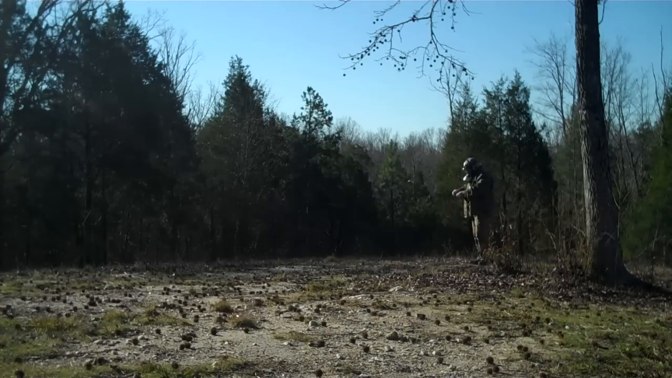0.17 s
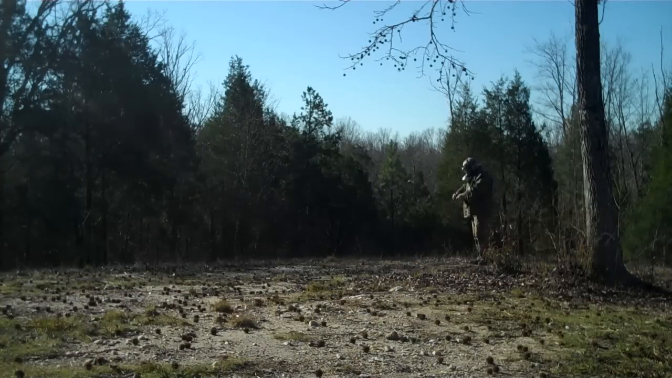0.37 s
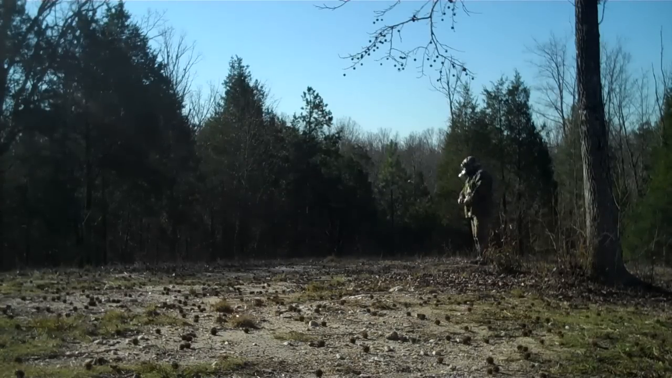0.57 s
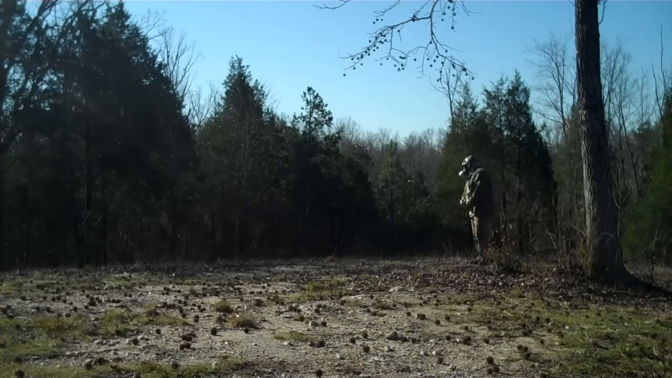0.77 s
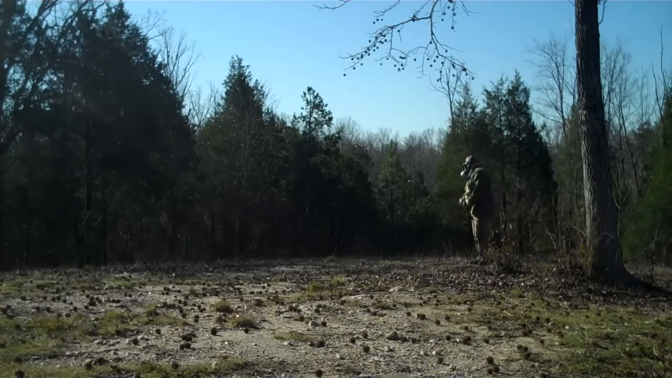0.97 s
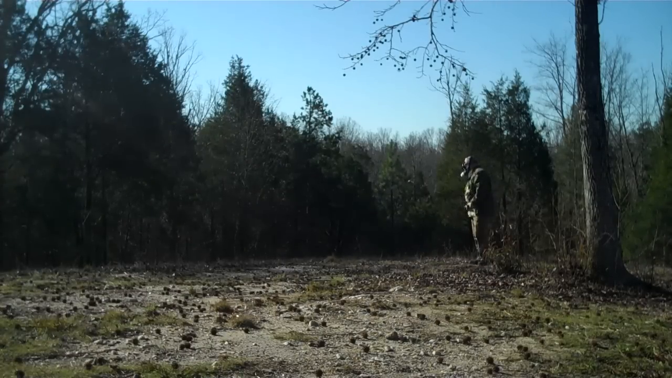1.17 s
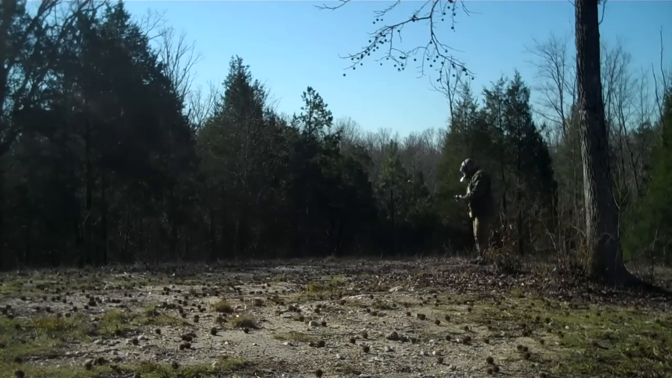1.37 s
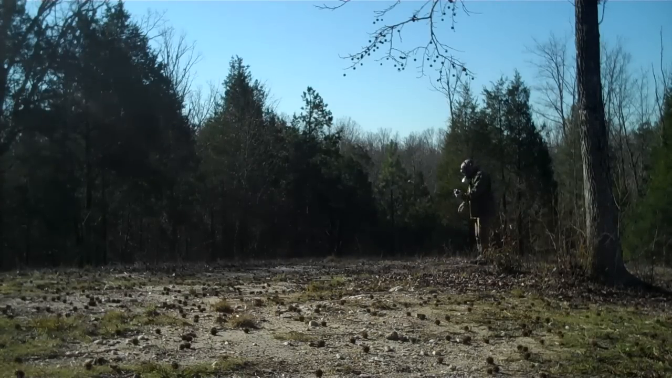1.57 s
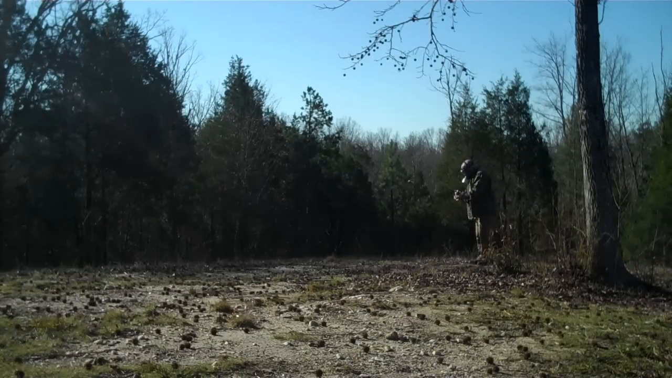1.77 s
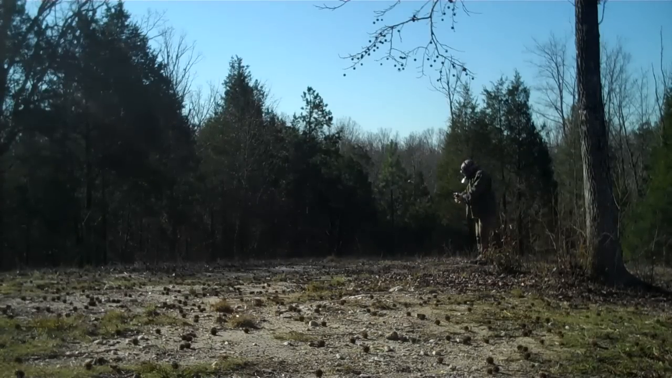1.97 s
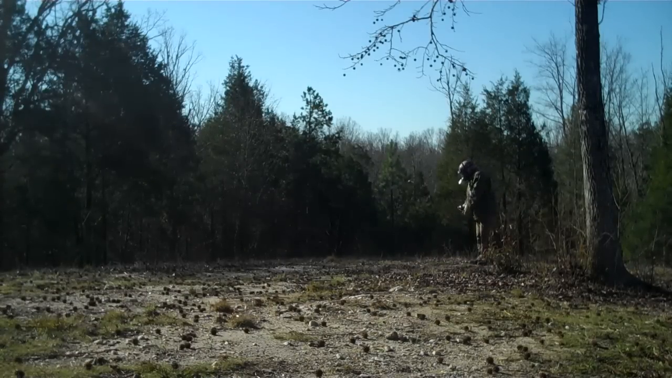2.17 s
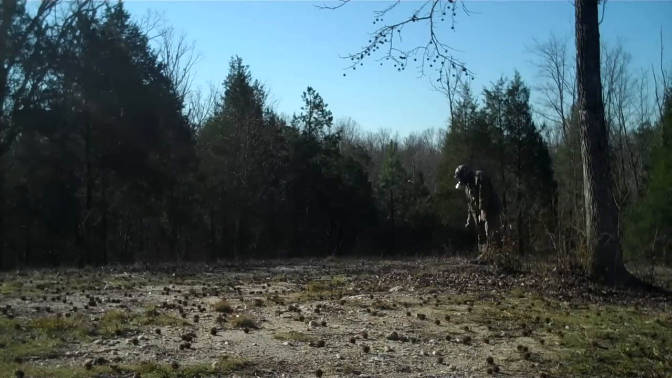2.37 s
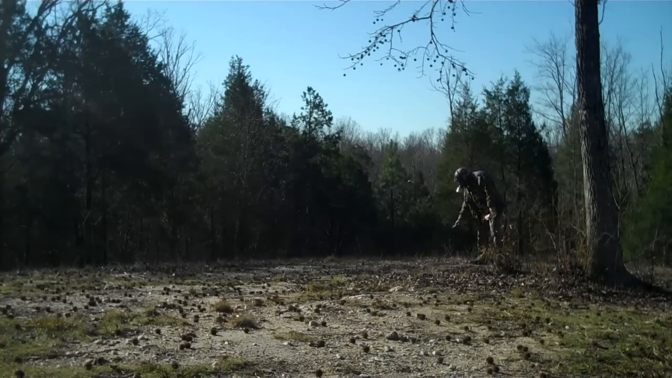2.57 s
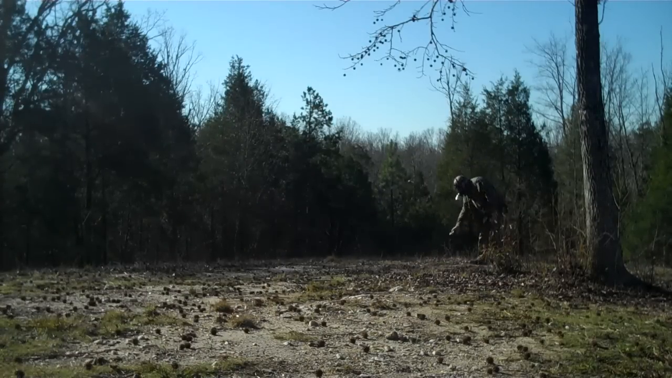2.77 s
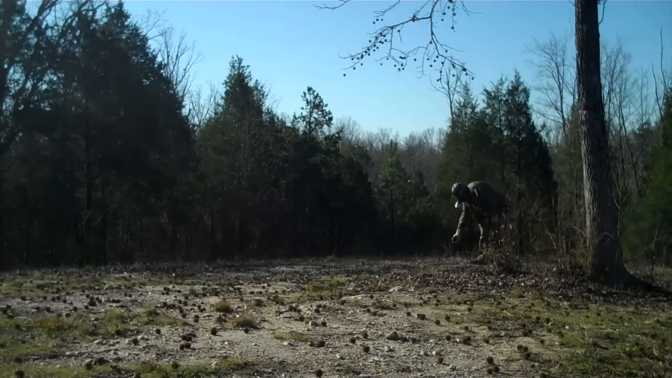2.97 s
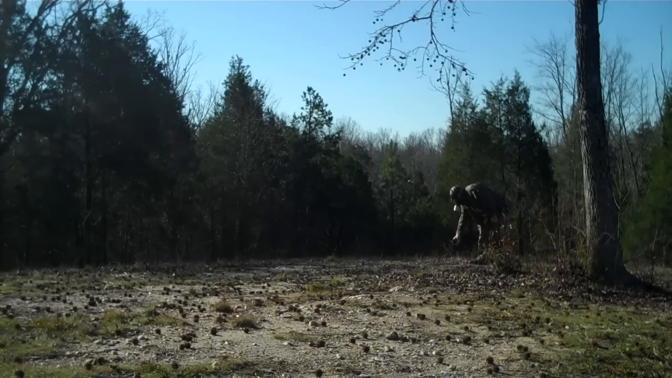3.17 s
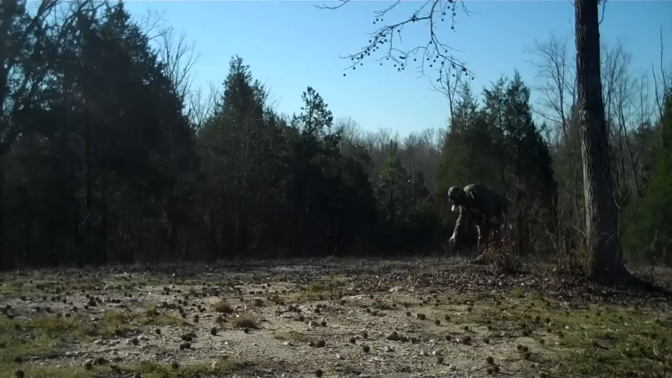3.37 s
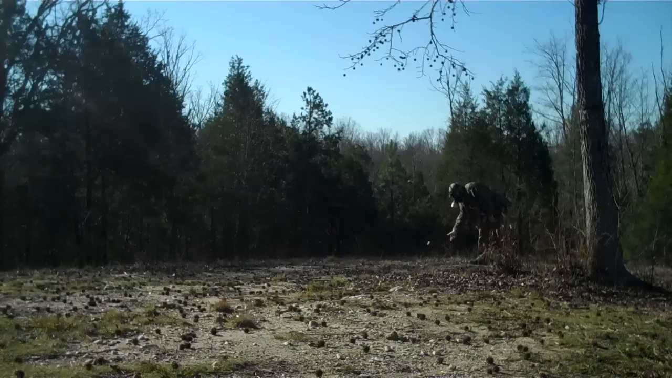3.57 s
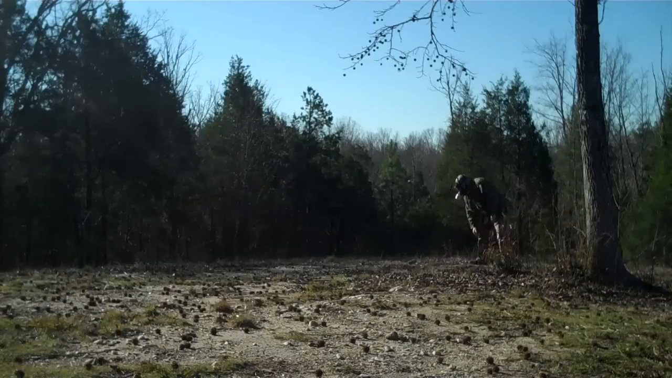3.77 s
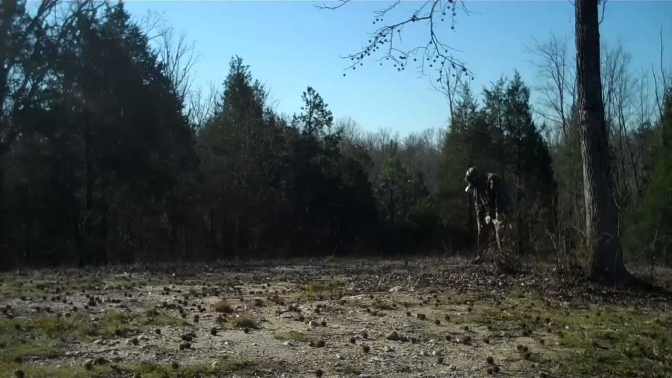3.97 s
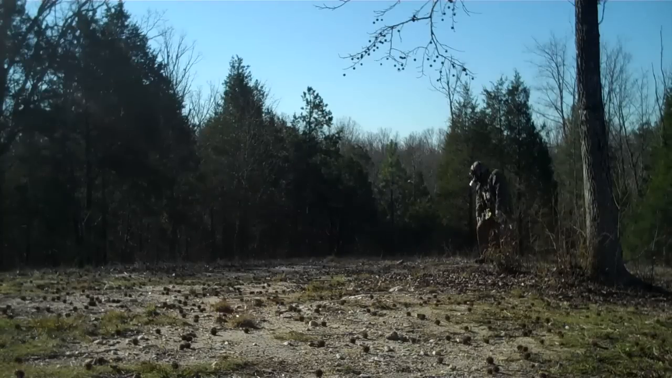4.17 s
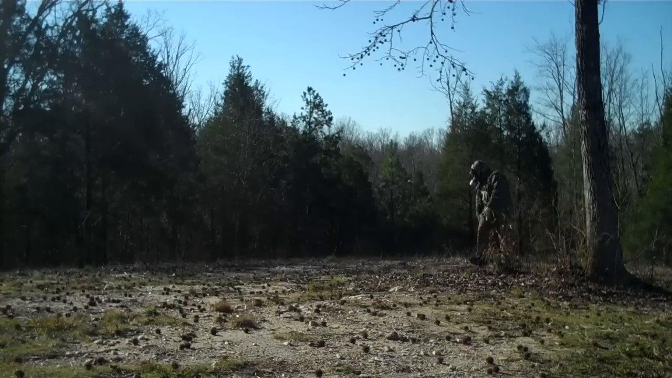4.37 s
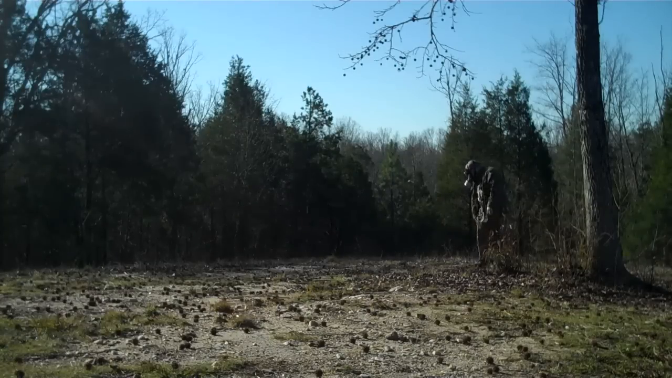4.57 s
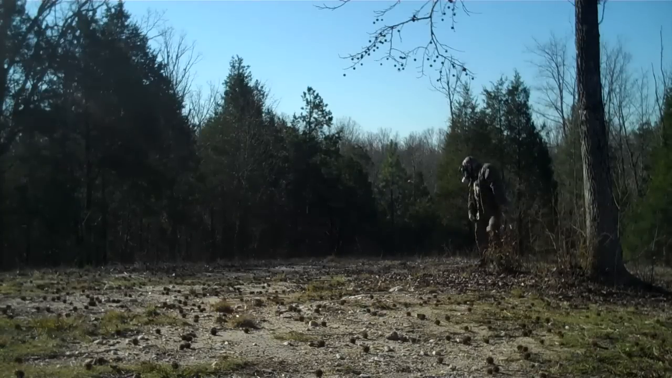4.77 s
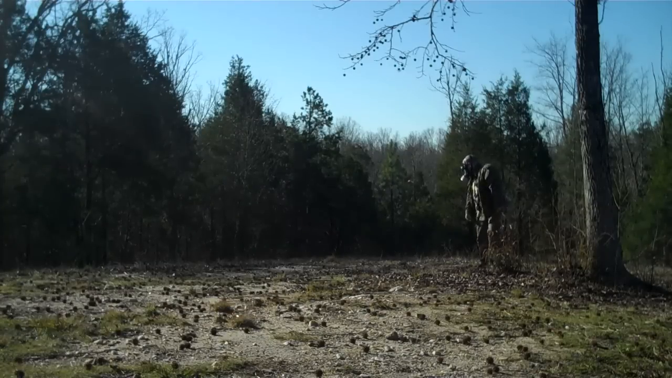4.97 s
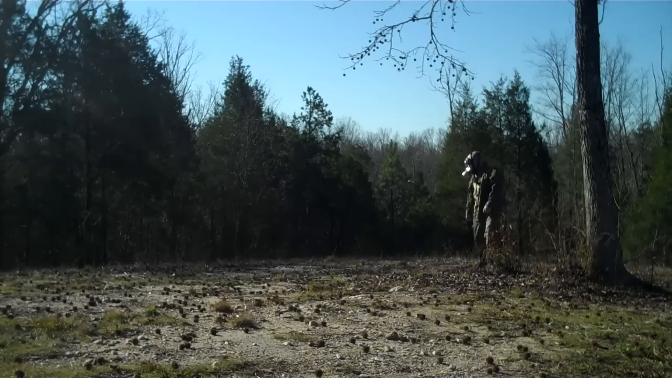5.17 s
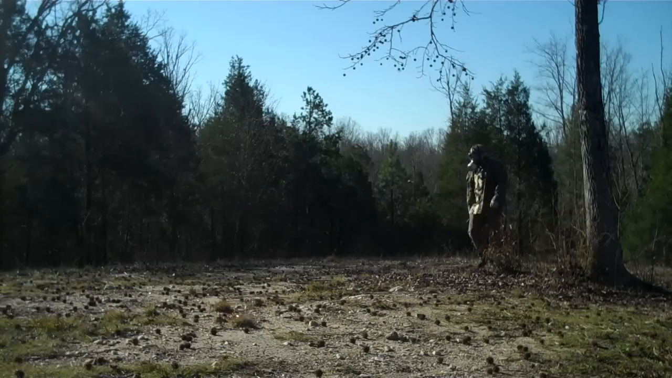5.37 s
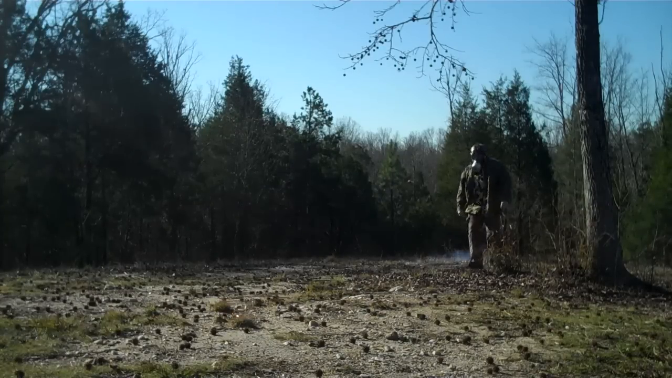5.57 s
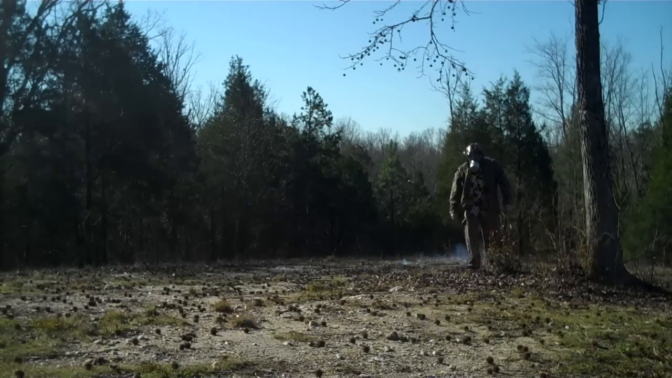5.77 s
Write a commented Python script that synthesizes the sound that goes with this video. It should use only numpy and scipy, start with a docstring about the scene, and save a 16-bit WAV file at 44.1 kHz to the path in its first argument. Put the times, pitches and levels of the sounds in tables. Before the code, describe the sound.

Quiet woods with soft wind and small metal clicks, leaves rustling, then a sudden overloaded pop and a short sputtering hiss of smoke.

```python
"""Wind murmurs softly over quiet woods, faint tones drift in and a small bird whistles.
A smoke grenade is readied: its pin and lever click and ring, dry leaves crackle, twigs snap.
Set down, it fires with a sharp pop, a pressure push with noise bursts, that overloads the recorder.
A moment later smoke rushes from the vent, a sputtering jet of noise coloured by the hollow can.
The trees answer faintly, as decaying noise convolved with the sounds."""
import sys
import numpy as np
from scipy import signal
from scipy.fft import rfft, irfft, next_fast_len
from scipy.io import wavfile
from scipy.ndimage import map_coordinates

SR = 44100
rng = np.random.default_rng(int(sys.argv[2]) if len(sys.argv) > 2 else 0)


def inscribe(sig):
    """Save sig as 16-bit PCM at rate SR to the path in sys.argv[1].

    A 1-D sig is mono; a 2-D sig holds one channel per row.
    Samples are clipped to [-1, 1] before scaling.
    """
    pcm = np.round(np.clip(np.atleast_2d(sig).T, -1, 1) * 32767)
    wavfile.write(sys.argv[1], SR, pcm.astype(np.int16))


N = 256662
T = np.arange(N) / SR  # s

# How alike scattered sound is at the two microphones: pitch_hz, likeness (0 to 1)
SCATTERED_ALIKE = [(130, 0.96), (600, 1), (1400, 0.78), (3000, 0.63), (6500, 0.094)]
# Colour difference of the two microphones: pitch_hz, left_minus_right_db
MICROPHONE_LEAN = [(2500, -0.5), (4300, -1.5), (5800, -7.5), (7400, 13), (9500, 11), (14000, 16)]


def pop():
    """The fuse fizzes, the seal cracks, and the charge bursts out in a blast with a spray of gas behind it."""
    # Colour of the pressure burst: pitch_hz, level_db
    blast_colour = [(30, -21), (80, -1.5), (160, -3.5), (400, -3), (900, 0.5), (1500, 2.5), (2100, 0.5),
                    (3000, -18), (7000, -23), (14000, -31)]
    # The blast at the two microphones: pitch_hz, likeness (0 to 1)
    blast_alike = [(100, 0.62), (500, 0.96), (2000, 0.98)]
    # Left-right tilt of the blast: pitch_hz, left_minus_right_db
    blast_lean = [(200, -16), (500, -3), (1200, 1)]
    # Colour of the gas: pitch_hz, level_db
    gas_colour = [(60, -14), (250, -22), (600, -10), (1300, -11), (2000, -1.5), (3000, -9.5), (3900, -6),
                  (4400, -10.5), (5700, -2), (7400, -7), (8600, -17), (10200, -31), (14000, -40)]
    # Colour of the blast thrown back by the ground: pitch_hz, level_db
    scatter_colour = [(100, -29), (450, 4), (1300, 7.5), (2400, -7), (5000, -37)]
    fizz_s, crack_s, burst_s = 5.577, 5.6008, 5.6043
    shock_db, push_s = 5, 0.00087  # the first pressure front and the length of its push

    t = T - burst_s
    fizz = amp(-47.5) * decay(T - fizz_s, 0.08)
    crack = amp(-25) * fade(T - crack_s, 0.00038)
    lead = (fizz + crack) * (t < 0)
    spray = amp(-2.5) * fade(t, 0.0005) * decay(t, 0.085)
    gas = stereo(white(), gas_colour, SCATTERED_ALIKE, MICROPHONE_LEAN) * (lead + spray)

    blast = stereo(white(), blast_colour, blast_alike, blast_lean) * amp(5.5) * decay(t, 0.021)
    u = np.maximum(t, 0) / push_s
    shock = amp(shock_db) * (1 - u) * np.exp(-u)  # a push, then a weaker pull
    scatter = stereo(white(), scatter_colour, SCATTERED_ALIKE, MICROPHONE_LEAN)
    scatter *= amp(-22.5) * decay(t, 0.27)
    burst = gas + fade(t, 0.00051) * (shock + blast + scatter)
    # the burst has little deep bass
    return signal.sosfilt(signal.butter(2, 95, "highpass", fs=SR, output="sos"), burst)


def jet():
    """The vent spits; burning smoke builds, flares and sags, roaring through the can; its hiss fades first."""
    # Colour of the roar before the can shapes it: pitch_hz, level_db
    roar_colour = [(40, -45), (110, -19), (250, -7.5), (480, -1.5), (750, -3.5), (1100, -4.5), (1550, -4.5),
                   (2150, -2.5), (2900, -2.5), (3600, -7.5), (6000, -25), (12000, -69)]
    # Colour of the hiss: pitch_hz, level_db
    hiss_colour = [(1500, -10), (3800, -1), (4600, 1.5), (5800, 3), (7200, 1.5), (8200, -8), (10500, -26),
                   (14000, -35)]
    # The charge flares: peak_s, boost_db, half_length_s
    surges = [(5.682, 4, .005), (5.703, 5, 0.0057), (5.725, 4.5, 0.0037), (5.752, 4, 0.0085)]
    open_s = 5.6625
    roar_db, hiss_db = -24, -27  # base levels of the jet
    build_s, build_db = 0.016, 4  # the flow builds up after the vent opens
    hold_s, sag_db_per_s = 0.11, 138  # then holds, and sags as the pressure drops
    hiss_fade_db_per_s = 38  # the hiss dies away from the start
    roar_flutter_db, hiss_flutter_db = 1.5, 1.6

    t = T - open_s
    age = np.maximum(t, 0)
    flares_db = sum(db * np.exp(-((T - s) / width) ** 2) for s, db, width in surges)
    flow_db = build_db * (fade(t, build_s) - 1) - sag_db_per_s * np.maximum(age - hold_s, 0)

    roar_level_db = roar_db + flow_db + flares_db + roar_flutter_db * wobble(300)
    roar = stereo(filtered(white(), cavity), roar_colour, SCATTERED_ALIKE, MICROPHONE_LEAN)
    roar *= amp(roar_level_db)

    hiss_level_db = hiss_db + flow_db + 0.44 * flares_db - hiss_fade_db_per_s * age
    hiss_level_db += hiss_flutter_db * wobble(700)
    hiss = stereo(white(), hiss_colour, SCATTERED_ALIKE, MICROPHONE_LEAN) * amp(hiss_level_db)

    spit = amp(-16.0) * stereo(white(), roar_colour, SCATTERED_ALIKE, MICROPHONE_LEAN)
    spit += amp(-18.5) * stereo(white(), hiss_colour, SCATTERED_ALIKE, MICROPHONE_LEAN)
    return (roar + hiss) * fade(t, 0.002) + spit * decay(t, 0.0099)


def cavity(hz):
    """The hollow can favours a few narrow bands."""
    # Cavity resonances: centre_hz, width_hz, boost_db
    resonances = [(1500, 170, 8), (1940, 130, 4.5), (2160, 160, 8.5), (1270, 120, 3), (940, 180, 1.5)]
    return amp(sum(boost / (1 + (2 * (hz - centre) / width) ** 2) for centre, width, boost in resonances))


def handling():
    """The lever cracks and sets the loose parts ringing unsteadily; some knocks also sound the hollow can."""
    # The lever and the can knock: start_s, level_db, t60_s, clack_hz, clack_db, ring_db
    lever_clicks = [(3.5910, -30.5, 0.0086, 3670, -8, -18), (3.6098, -20, 0.005, 3500, -13, -24),
                    (3.6160, -7, 0.0053, 3600, -17, -33), (3.6188, -7, 0.0065, 3520, -16, -19.5),
                    (3.6255, -29, 0.042, 3930, -4.5, -12), (3.8892, -19, 0.049, 2880, -34, -33)]
    # Colour of the crack: pitch_hz, level_db
    snap_colour = [(1300, -60), (2500, -51), (5000, -0.5), (5700, 13), (6400, 3.5), (7500, 4.5),
                   (8400, -14), (9800, -15), (10600, -17.5), (14000, -28)]
    # The metal's ringing modes: pitch_hz, level_db, t60_s
    steel_modes = [(3540, -13, 0.07), (5071, -19, 0.08), (5380, -2.5, 0.14), (5770, -2, .105),
                   (8050, -10, 0.12), (10000, -19, 0.055), (13880, -22, 0.067)]
    # Hollow notes of the can: start_s, pitch_hz, level_db, t60_s
    can_notes = [(1.106, 491, -53, 0.15), (3.616, 616, -30, 0.012), (3.617, 567, -50, 0.52),
                 (3.891, 198, -51, 0.06), (3.894, 474, -51.5, 0.39)]
    rattle_rad = 0.22  # phase unsteadiness of the ring

    out = np.zeros((2, N))
    t = np.arange(SR // 2) / SR
    for s, db, t60, clack_hz, clack_db, ring_db in lever_clicks:
        crack = contact(snap_colour, t, t60, spread=0.72)
        crack += amp(clack_db) * contact(hump(clack_hz), t, t60, spread=0.6)
        ring = np.zeros((2, len(t)))
        for hz, level, life in steel_modes:
            # level and phase differ a little from side to side
            strength = amp(level + rng.normal(0, 1, (2, 1)))
            phase = rng.normal(0, 0.92, (2, 1)) + rattle_rad * wobble(115)[:len(t)]
            ring += strength * decay(t, life) * np.sin(2 * np.pi * hz * t + phase)
        add(out, s, amp(db) * (crack + amp(ring_db) * ring * fade(t, 0.0015)))
    for s, hz, db, t60 in can_notes:
        add(out, s, amp(db) * fade(t, 0.00076) * decay(t, t60) * np.sin(2 * np.pi * hz * t))
    return out


def pin():
    """The safety pin catches and slips with dry clicks, each a bright impact with a damped clack."""
    # Catches and slips: start_s, level_db, t60_s, clack_hz, clack_db
    pin_clicks = [(1.1052, -26, 0.02, 3700, 3.5), (1.1103, -25, 0.029, 3730, -4),
                  (1.7545, -28.5, 0.0099, 2960, -1), (1.7569, -12, 0.0058, 2660, -18)]
    # Bright part of the click: pitch_hz, level_db
    pin_colour = [(1000, -42), (2000, -21), (3800, -23.5), (5100, -15), (5700, -0.5), (6250, 1.5),
                  (6900, -2), (7700, -13), (9500, -22.5), (10500, -30), (14000, -37)]
    out = np.zeros((2, N))
    t = np.arange(SR // 10) / SR
    for s, db, t60, clack_hz, clack_db in pin_clicks:
        bright = contact(pin_colour, t, t60, spread=0.78)
        clack = amp(clack_db) * contact(hump(clack_hz), t, t60, spread=0.46)
        add(out, s, amp(db) * (bright + clack))
    return out


def litter():
    """Feet and hands crush leaves into crackles, scuff soil, break twigs, knock on sticks; fuse ticks join in."""
    # A foot or hand presses down: full_weight_s, press_s, release_t60_s, leaf_db, soil_db
    steps = [(1.172, 0.011, 0.071, -58, -62), (1.86, 0.017, 0.12, -63, -75),
             (2.742, 0.074, 0.04, -50.5, -60), (2.8, 0.013, 0.19, -57.5, -64),
             (3.01, 0.14, 0.14, -62, -66.5), (3.6, 0.23, 1, -59.5, -62), (3.883, 0.21, 0.32, -43.5, -50.5),
             (4.509, 0.13, 0.17, -49.5, -55), (4.605, 0.096, 0.64, -52.5, -56),
             (5.085, 0.12, 1, -59, -64.5), (5.184, .04, 0.28, -51.5, -57.5)]
    # Colour of crisp leaves: pitch_hz, level_db
    leaf_colour = [(1500, -33), (4200, -14.5), (5700, 0.5), (7300, -1.5), (8800, -15.5), (11000, -35),
                   (14500, -42)]
    # Colour of scuffed ground: pitch_hz, level_db
    soil_colour = [(100, 2.5), (600, 0.5), (2300, 2.5), (4000, 3), (8000, -16), (14000, -30)]
    # Soft shuffles, and the small ticks as the fuse starts to fizz: peak_s, level_db, half_length_s
    shuffles_and_ticks = [(1.51, -57.5, 0.024), (4.615, -59.5, 0.031), (5.568, -55, 0.0026),
                          (5.58, -51, 0.0046)]
    # Colour of the shuffles and ticks: pitch_hz, level_db
    soft_colour = [(100, -21), (420, 4), (640, 1), (920, 5), (1400, -10), (6000, -27)]
    # Twigs and dry leaves breaking: start_s, level_db, pitch_hz
    twigs = [(2.713, -36, 6160), (2.7212, -39, 6300), (2.7478, -32, 6200), (2.7507, -24, 6800),
             (2.7857, -35, 6000), (2.7878, -30.5, 6300), (2.7986, -36, 6400), (3.7720, -36, 4800),
             (4.204, -41.5, 7150), (4.514, -28.5, 3700), (4.5156, -27, 6700), (5.0733, -38, 6600),
             (5.0903, -40, 6220), (5.136, -38, 6900)]
    # Dull knocks of gear and sticks: start_s, level_db
    knocks = [(4.4649, -30), (4.5134, -43), (4.6047, -36), (4.635, -39), (4.675, -39.5)]
    # Colour of the knocks: pitch_hz, level_db
    thud_colour = [(200, -9), (700, -2), (1400, 2.5), (2700, 3), (4000, -12), (9000, -32)]
    twig_t60_s, knock_t60_s = 0.0085, 0.0077

    t = np.arange(SR // 10) / SR
    specks = rng.random(N) < 1500 / SR  # about 1500 crackles a second
    crackles = white() * specks * amp(0.94 * np.minimum(rng.exponential(size=N), 3))
    clumps = amp(3.9 * np.tanh(wobble(110)))
    rustle = unit(crackles * clumps) + 0.74 * white()
    leaves = stereo(rustle, leaf_colour, [(3000, 0.47)], [(3000, 0)])
    soil = stereo(white() * clumps, soil_colour, SCATTERED_ALIKE, [(3000, 0)])

    power = np.zeros((2, N))  # overlapping presses add as power: leaves, soil
    for s, press_s, release_s, leaf_db, soil_db in steps:
        power += (amp([[leaf_db], [soil_db]]) * press(s, press_s, release_s)) ** 2
    leaf_gain, soil_gain = np.sqrt(power)
    out = leaf_gain * leaves + soil_gain * soil

    soft_noise = stereo(white(), soft_colour, SCATTERED_ALIKE, MICROPHONE_LEAN)
    for s, db, width in shuffles_and_ticks:
        out += amp(db) * np.exp(-((T - s) / width) ** 2) * soft_noise
    for s, db, hz in twigs:
        add(out, s, amp(db) * contact(hump(hz), t, twig_t60_s, spread=0.55))
    for s, db in knocks:
        add(out, s, amp(db) * contact(thud_colour, t, knock_t60_s, spread=0.5))
    return out


def press(s, press_s, release_s):
    """Weight comes on over the press time, then lifts; the leaves settle slowly."""
    settle_db, settle_t60_s = -10.5, 2  # crushed leaves keep creeping back after each press
    t = T - s
    after = np.maximum(t, 0)
    settling = amp(settle_db) * decay(after, settle_t60_s)
    return fade(t + press_s, press_s) ** 2 * np.maximum(decay(after, release_s), settling)


def bird():
    """Thin, unsteady whistles: sine tones that bend through three pitches."""
    # Bird notes: start_s, length_s, start_hz, middle_hz, end_hz, level_db
    bird_notes = [(0.26, .042, 7300, 7000, 7600, -73), (0.47, .042, 8350, 7860, 8200, -65.5),
                  (0.504, 0.097, 8460, 7630, 7440, -67), (0.63, 0.13, 8500, 7630, 7630, -67.5),
                  (0.812, 0.022, 6120, 7200, 7650, -53.5)]
    warble_hz = 70  # unsteadiness of the pitch
    out = np.zeros((2, N))
    for s, length, start_hz, middle_hz, end_hz, db in bird_notes:
        u = np.linspace(0, 1, int(length * SR))
        bend = np.polyfit([0, 0.5, 1], [start_hz, middle_hz, end_hz], 2)
        hz = np.polyval(bend, u) + warble_hz * wobble(111)[:len(u)]
        flutter = amp(2.4 * wobble(96)[:len(u)])
        swell = np.sqrt(np.abs(np.sin(np.pi * u)))
        add(out, s, amp(db) * flutter * swell * np.sin(2 * np.pi * np.cumsum(hz) / SR))
    return out


def air():
    """A soft, nearly steady murmur of wind over the woods; wavering tones drift in from far away."""
    # Colour of the still woods: pitch_hz, level_db
    air_colour = [(25, -10), (60, -5.5), (130, -5), (215, -7.5), (270, -9), (700, -13), (1800, -16.5),
                  (4500, -20), (7000, -21.5), (10000, -25), (14000, -25.5)]
    # Left-right likeness of the murmur: pitch_hz, likeness (0 to 1)
    air_alike = [(60, .45), (140, 0.78), (300, 0.5), (650, 0.24), (2000, 0.033)]
    # Left-right tilt of the murmur: pitch_hz, left_minus_right_db
    air_lean = [(100, -0.5), (600, 6), (1300, 3.5), (4000, .5)]
    # Faint distant drones: peak_s, half_length_s, pitch_hz, level_db
    far_tones = [(.3, 0.45, 213.6, -66), (1.078, 0.094, 428, -63), (1.238, 0.082, 750, -71),
                 (2.4, 0.34, 213.3, -67.5)]
    air_db, gust_db = -59, 0.6
    wind = amp(air_db + gust_db * wobble(3.32)) * stereo(white(), air_colour, air_alike, air_lean)
    tones = np.zeros(N)
    for s, width, hz, db in far_tones:
        swell = amp(db) * np.exp(-((T - s) / width) ** 2)
        tones += swell * np.sin(2 * np.pi * hz * T + wobble(9.9))
    return wind + tones


def woods(x):
    """Nearby ground scatters at once; the trunks answer later, each band dying at its own rate."""
    # Decay of the trunks' echo: pitch_hz, t60_s
    tree_decay = [(200, 0.14), (2000, 0.97), (6000, 0.58), (12000, 0.38)]
    hz, t, z = signal.stft(white(size=SR * 3 // 4), SR, nperseg=256)
    trunks = amp(-60 * t / along(tree_decay, hz)[:, None]) * (0.13 + fade(t - 0.05, 0.025))
    ground = 1.94 * decay(t, 0.083)
    tail = signal.istft(z * (trunks + ground), SR, nperseg=256)[1]
    return signal.fftconvolve(x, tail / np.linalg.norm(tail[0]), axes=1)[:, :N]


def contact(spectrum, t, t60, spread):
    """A sharp impact shared by both microphones and a short scrape that differs, tilted in the treble."""
    # Clicks at the two microphones: pitch_hz, left_minus_right_db
    click_lean = [(4500, -1.5), (5700, -8), (7400, 14), (10000, 10)]
    # folding the cepstrum puts the colour's energy at and after the impact
    log_gain = np.log(amp(along(spectrum, np.fft.rfftfreq(2 * len(t), 1 / SR))))
    cepstrum = irfft(log_gain)[:len(t)]
    response = irfft(np.exp(rfft(2 * cepstrum, 2 * len(t))))
    shape = decay(t, t60)
    force = white(size=len(t)) * shape
    force[0, 0] += 0.99 * np.linalg.norm(shape)  # the impact reaches both microphones together
    mid, side = signal.fftconvolve(force, response[None], axes=1)[:, :len(t)]
    pair = leaning(np.array([mid + spread * side, mid - spread * side]), click_lean)
    return 0.5 * unit(pair) * np.sqrt(np.mean(shape ** 2))


def hump(hz):
    """The spectrum of one heavily damped resonance, as (Hz, dB) points."""
    return [(hz / 3, -38), (hz * 0.72, -17), (hz, 0), (hz * 1.28, -16), (hz * 2, -42)]


def stereo(pair, spectrum, alike, lean):
    """Two unrelated signals made a coloured left-right pair of rms 1."""
    def mid_side(hz):
        turn = np.arccos(np.clip(along(alike, hz), -1, 1)) / 2
        return amp(along(spectrum, hz)) * [np.cos(turn), np.sin(turn)]

    mid, side = filtered(pair, mid_side)
    return unit(leaning(np.array([mid + side, mid - side]), lean))


def leaning(pair, lean):
    """Tilt a pair to the left or right, band by band."""
    return filtered(pair, lambda hz: amp(np.outer([0.5, -0.5], along(lean, hz))))


def filtered(x, response):
    """x times a response of frequency."""
    n = x.shape[-1]
    m = next_fast_len(n + SR // 8)
    return irfft(rfft(x, m) * response(np.fft.rfftfreq(m, 1 / SR)), m)[..., :n]


def along(points, hz):
    """(Hz, value) points read on a log axis."""
    f, v = np.transpose(points)
    return np.interp(np.log(hz + 1), np.log(f + 1), v)


def white(size=N):
    """Two unrelated white noises."""
    return rng.standard_normal((2, size))


def wobble(rate):
    """A smooth random curve, rate knots a second."""
    return map_coordinates(rng.standard_normal(int(N * rate / SR) + 4), [T * rate])


def decay(t, t60):
    """Silent before t = 0, then dying away by 60 dB in t60 seconds."""
    return (t >= 0) * np.exp(-np.log(1000) * np.maximum(t, 0) / t60)


def fade(t, rise):
    """Opens from 0 to 1 over the rise time."""
    return np.clip(t / rise, 0, 1)


def amp(db):
    """Decibels to gain."""
    return 10 ** (np.asarray(db) / 20)


def unit(x):
    """Scale to rms 1."""
    return x / np.sqrt(np.mean(x ** 2) + 1e-20)


def add(track, s, sound):
    """Mix a sound in at a time in seconds."""
    part = track[:, round(s * SR):][:, :sound.shape[-1]]
    part += sound[..., :part.shape[-1]]


def scene():
    """Everything in the clearing, with its echo; the pin, held clear of the ground, has the dullest."""
    pin_echo_db, pin_echo_hz = -13.5, 4660  # the trunks return mostly the duller part of the pin's click
    near = pop() + jet() + handling() + litter()
    clicks, song = pin(), bird()
    dull_clicks = filtered(clicks, lambda hz: 1 / (1 + (hz / pin_echo_hz) ** 4))
    echo = woods(amp(-15.0) * near + amp(pin_echo_db) * dull_clicks + amp(-0.5) * song)
    return near + clicks + song + echo + air()


def record(dry):
    """The recorder clips at full scale, thins the deepest bass and keeps nothing above its band limit."""
    top_hz = 14500
    clipped = np.clip(dry, -1, 1)
    thinned = signal.sosfilt(signal.butter(1, 28, "highpass", fs=SR, output="sos"), clipped)
    return filtered(thinned, lambda hz: hz < top_hz)


dry = scene()
out = record(dry)
inscribe(out)
```